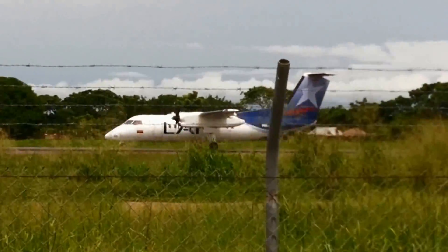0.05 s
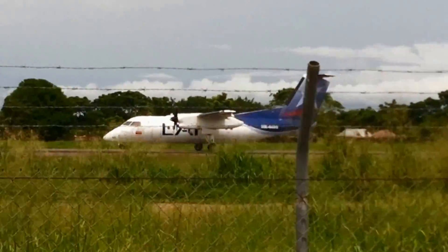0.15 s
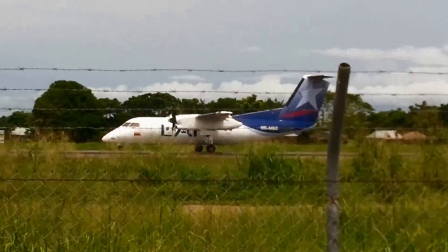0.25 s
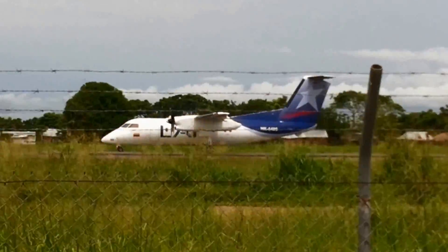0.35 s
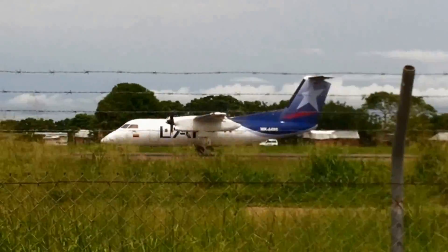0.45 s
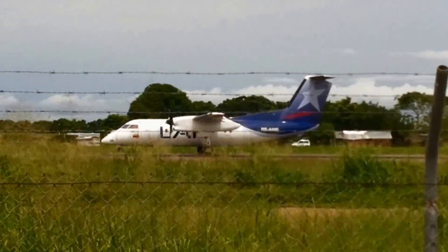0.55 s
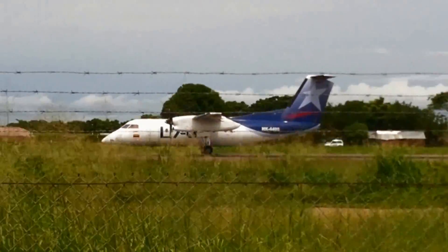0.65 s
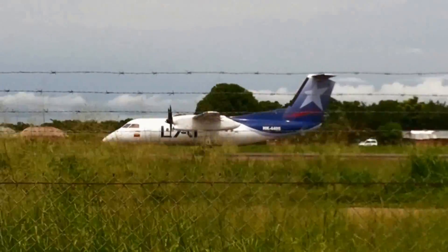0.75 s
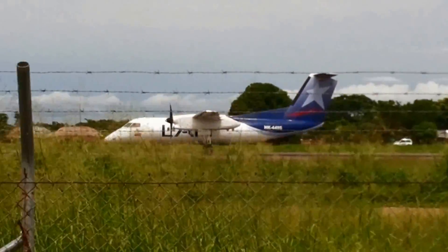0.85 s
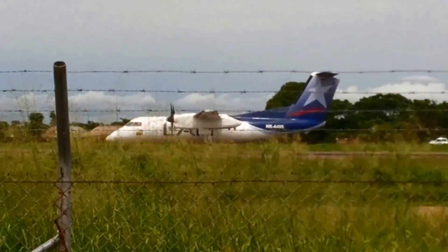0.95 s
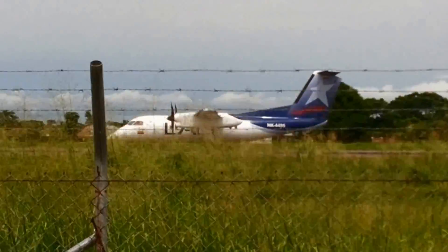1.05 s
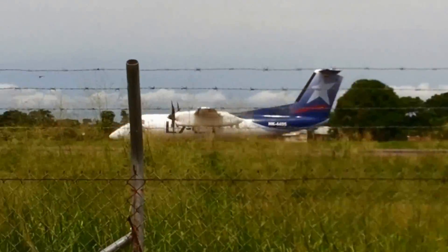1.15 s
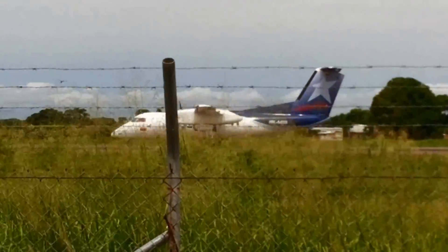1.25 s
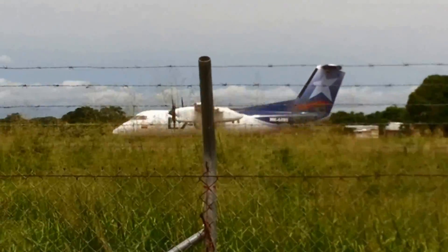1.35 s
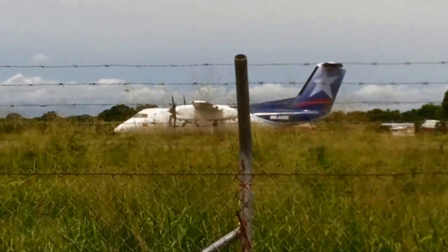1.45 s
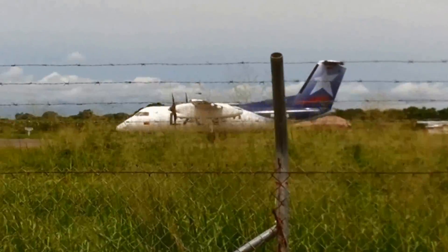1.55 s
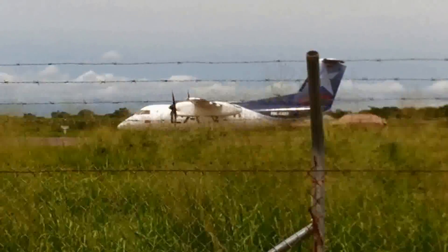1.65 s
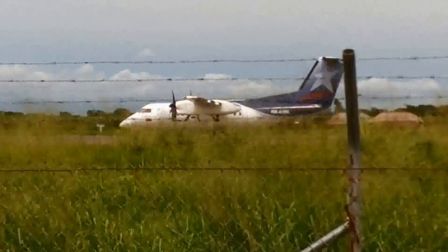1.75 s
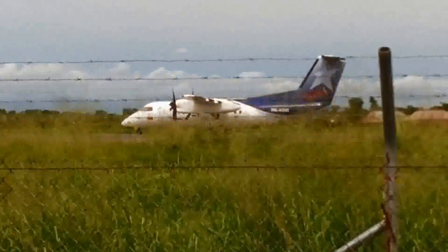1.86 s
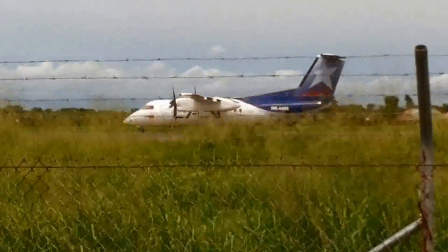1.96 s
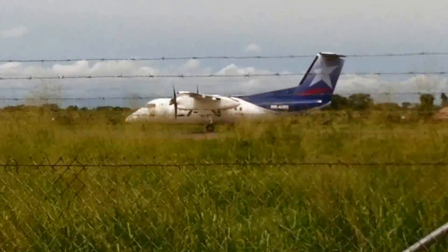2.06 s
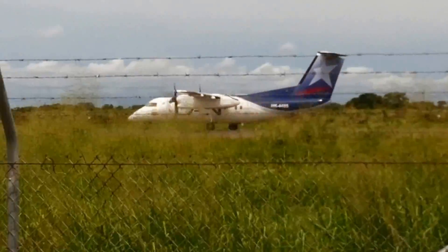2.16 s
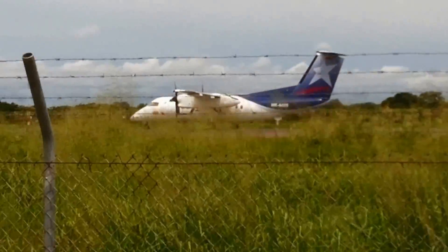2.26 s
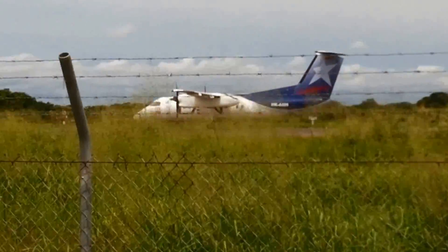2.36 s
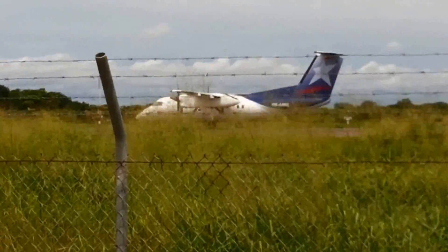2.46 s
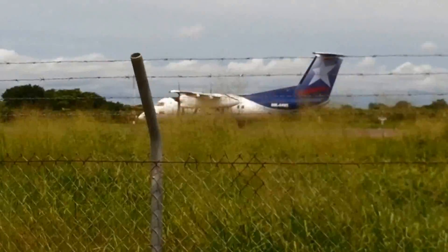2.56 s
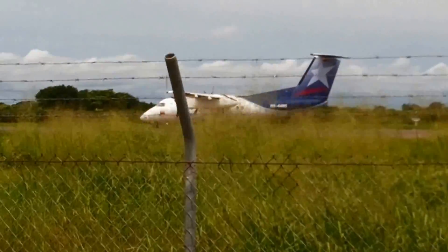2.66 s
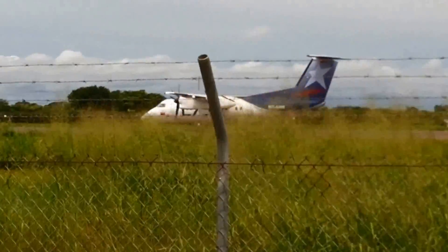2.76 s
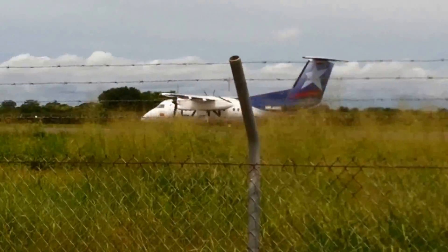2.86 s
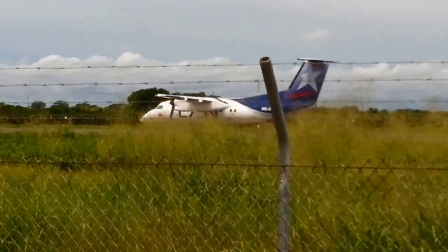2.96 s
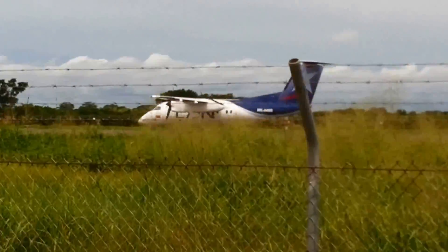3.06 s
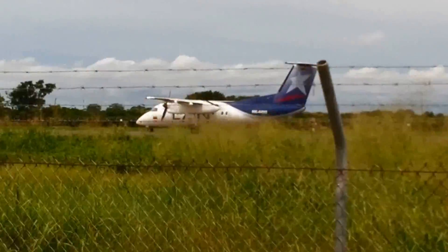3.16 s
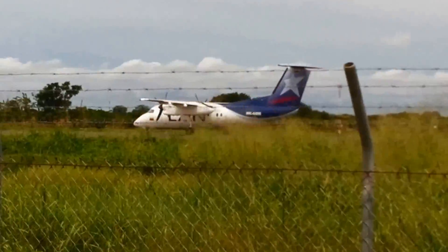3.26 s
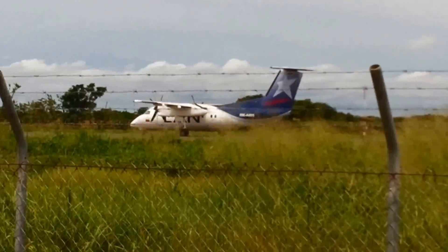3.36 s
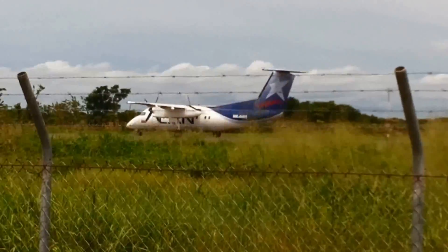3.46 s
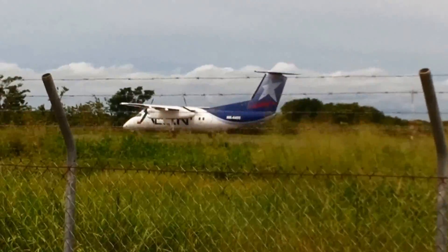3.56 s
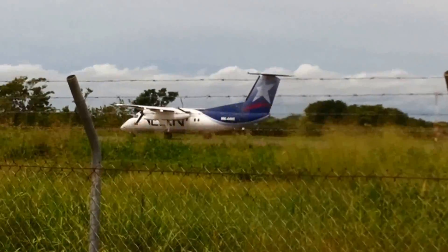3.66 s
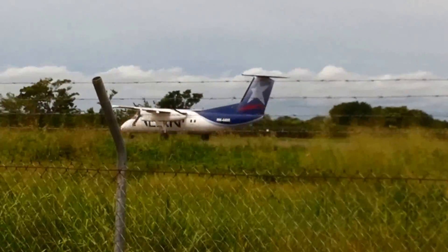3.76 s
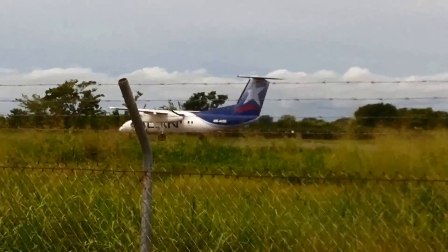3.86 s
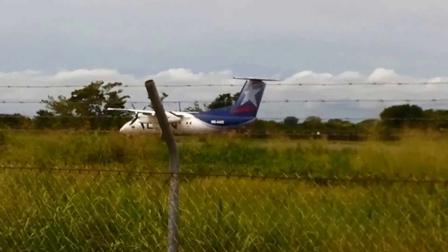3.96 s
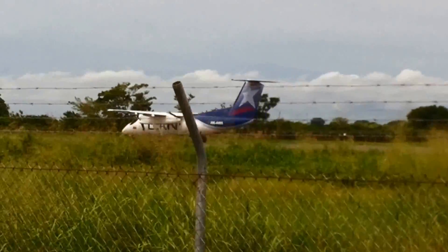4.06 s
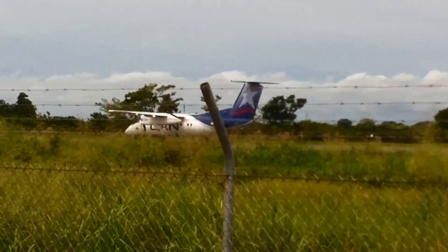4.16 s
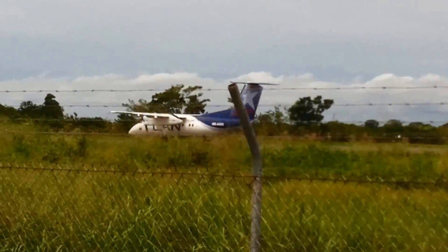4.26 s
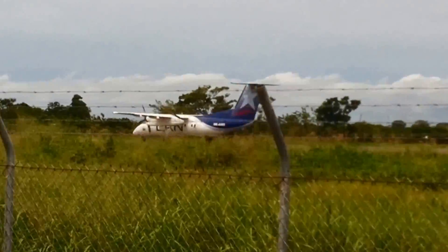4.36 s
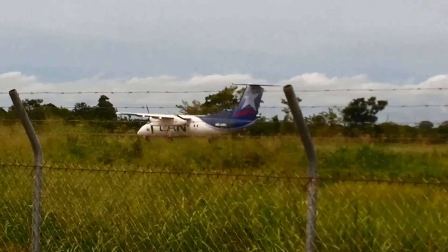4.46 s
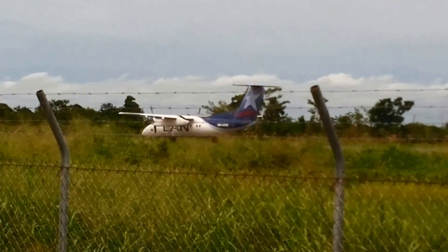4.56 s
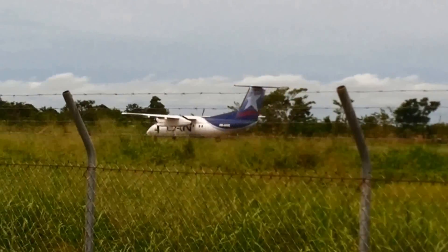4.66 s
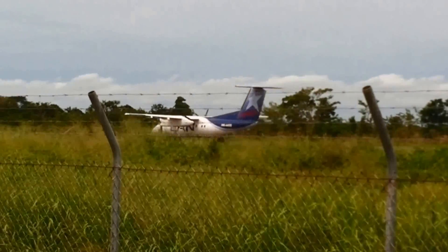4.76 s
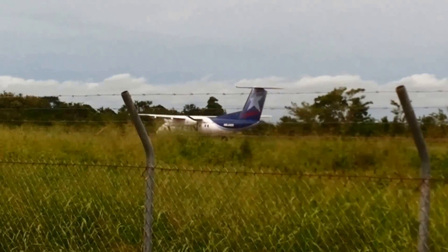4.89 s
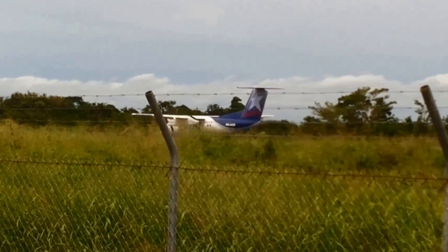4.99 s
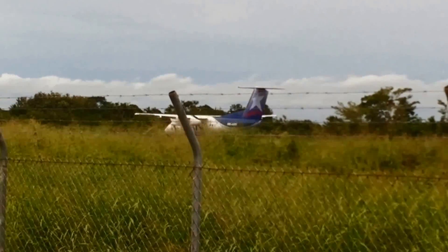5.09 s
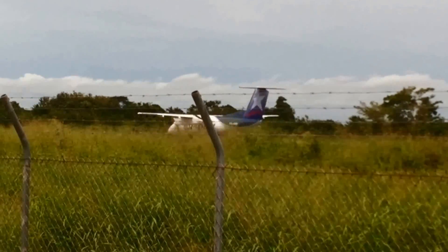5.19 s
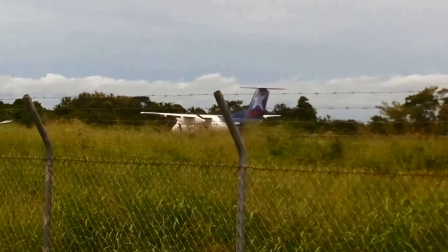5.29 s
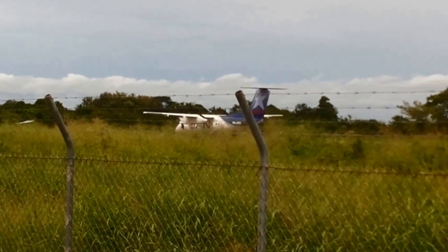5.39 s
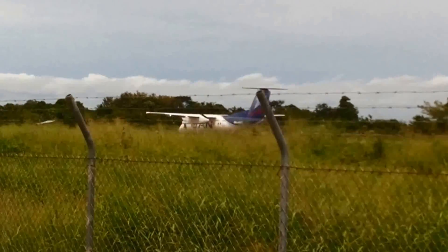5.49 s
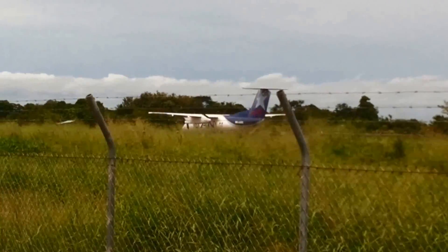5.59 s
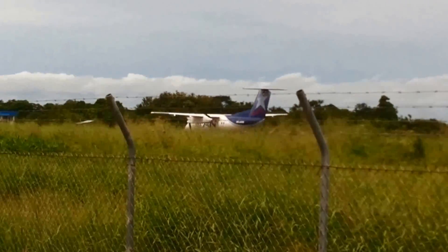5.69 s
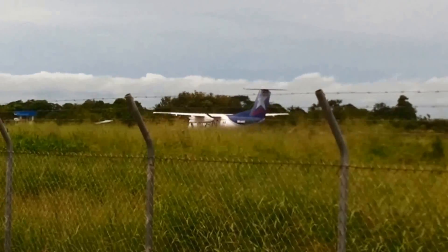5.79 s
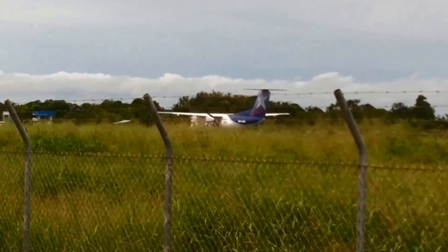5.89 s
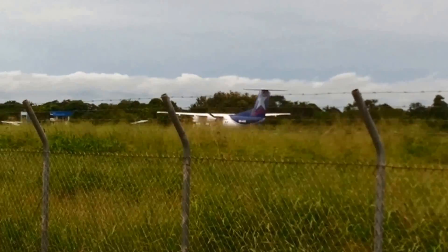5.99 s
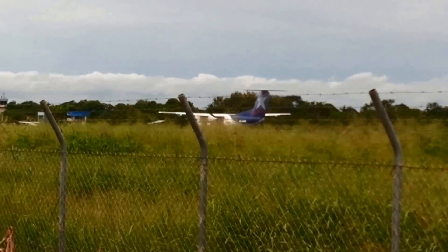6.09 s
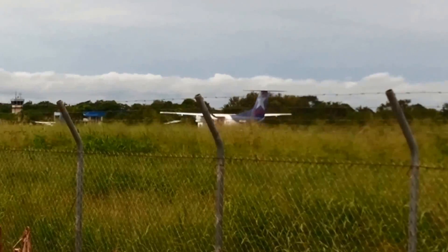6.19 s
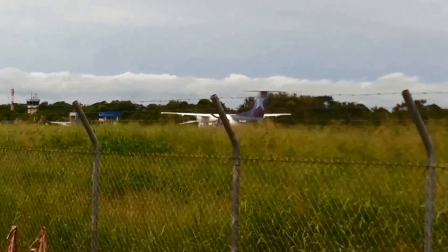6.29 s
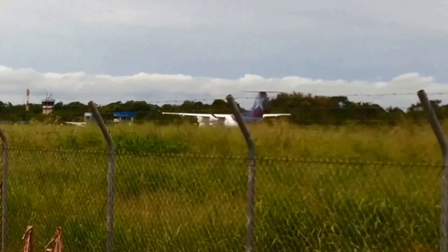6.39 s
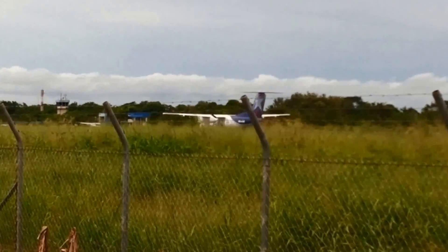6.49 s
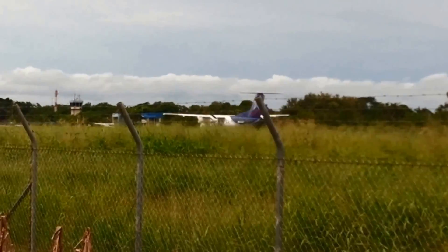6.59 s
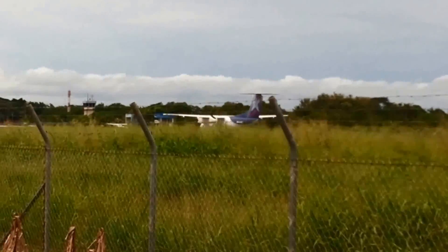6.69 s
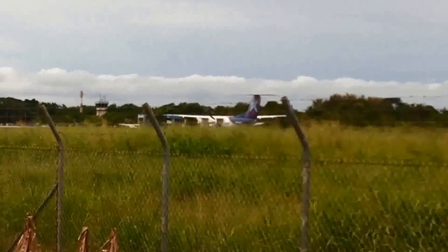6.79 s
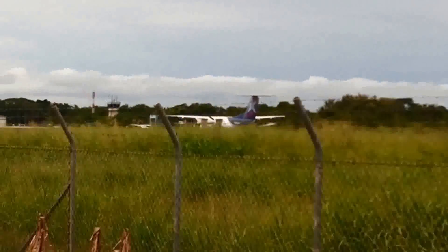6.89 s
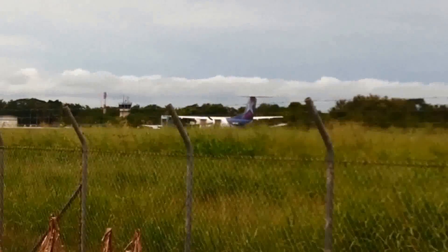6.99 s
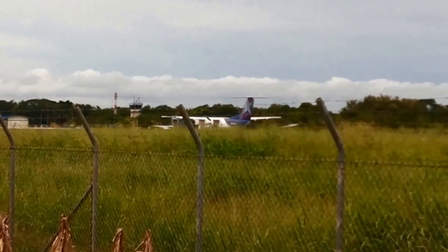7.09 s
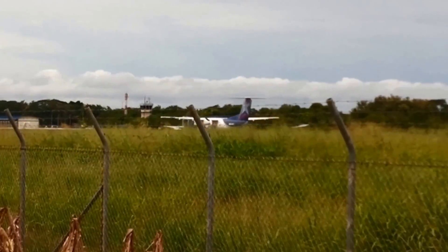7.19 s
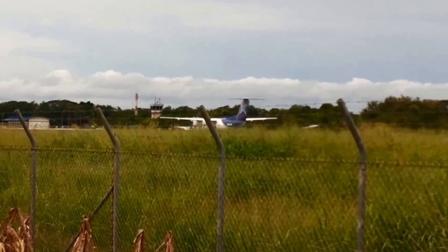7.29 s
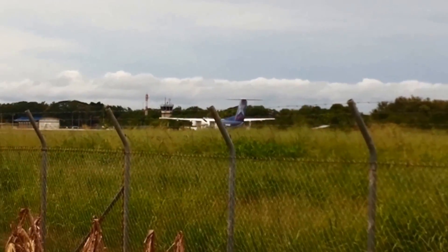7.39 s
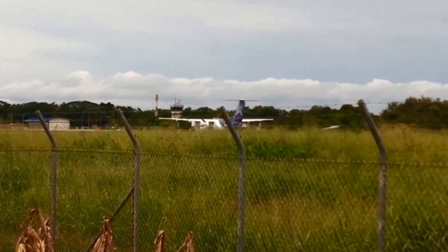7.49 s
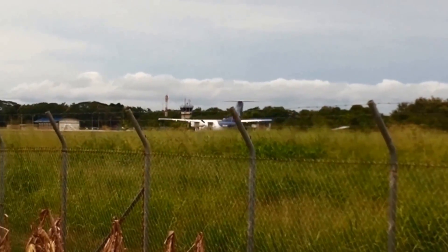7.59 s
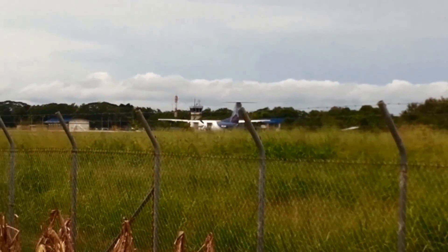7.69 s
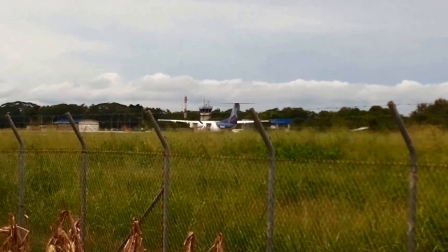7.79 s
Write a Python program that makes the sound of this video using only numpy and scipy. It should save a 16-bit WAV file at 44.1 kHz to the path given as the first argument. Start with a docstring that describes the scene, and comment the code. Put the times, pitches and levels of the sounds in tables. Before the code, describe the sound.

Loud from the start, a propeller airliner runs along a runway, with a deep drone, a rushing roar and a piercing, fluttering turbine whine. The high hiss surges in short bursts, the strongest slightly overloading the microphone at the airfield's edge. Around halfway the sound drops, swells once more, then fades as the plane moves away, its propeller pitch sliding gently down and its shrillness softening.

```python
"""Twin turboprop take-off roll.

Heard from the fence, it passes at full power and recedes down the runway. The propellers drone on a
sinking pitch over the roar of exhaust and slipstream; a compressor whines. A higher turbine tone,
scattered by the blade wakes into a shrill chopped hiss, flares in the moving air and overloads the mic."""
import sys
import numpy as np
from scipy import signal
from scipy.fft import rfft, irfft, next_fast_len
from scipy.io import wavfile
from scipy.ndimage import uniform_filter1d, map_coordinates

SR = 44100
rng = np.random.default_rng(int(sys.argv[2]) if len(sys.argv) > 2 else 0)


def dump_mix(stems):
    """Bounce the given channels to the path in sys.argv[1] as a 16-bit WAV at rate SR."""
    frames = np.atleast_2d(stems).T  # one column per channel
    limited = np.clip(frames, -1, 1)  # hard clip at full scale
    pcm = np.round(limited * 32767).astype(np.int16)
    wavfile.write(sys.argv[1], SR, pcm)


N = 345744

# Fade with distance, scaled per source: time_s, level_db
DISTANCE_FADE = [(0, -0.5), (3.2, 0), (4.1, -3.5), (4.85, -9), (6.2, -11.5), (7.84, -18.5)]
# Moving air focuses or thins the sound, scaled per source: centre_s, half_width_s, turbine_db, roar_db
AIR_SWELLS = [(0.08, .06, 0, 2.5), (0.324, 0.052, 4.5, 1), (0.448, 0.055, -0.5, 2), (0.894, 0.11, -6, -1.5),
              (1.427, 0.12, 3.5, 1), (1.696, .1, -2.5, 3), (1.89, 0.082, 4.5, 1), (2.165, 0.072, 1.5, 2.5),
              (2.42, .08, -2, 0), (2.63, 0.044, 9.5, 2), (2.744, 0.034, 0.5, 0), (3.006, 0.037, 1, 3),
              (3.288, 0.076, 2, 1.3), (3.537, 0.11, -3.5, 0), (3.7, 0.076, 0.5, 2), (4.001, .05, 3, 0.5),
              (4.23, .08, -5.5, -4.5), (4.412, 0.14, 8.5, 5.5), (5.97, 0.062, 5, 3), (6.0, 0.24, 1.5, 1.9),
              (6.676, .18, -2, 2)]
# Doppler-shifted blade-passing rate: time_s, rate_hz
BLADE_RATE = [(0, 82.3), (1, 80.8), (2, 79.2), (3, 77.7), (3.8, 76.5), (4.5, 75.9), (5.4, 74.2),
              (6.2, 73.3), (7.84, 72.5)]
# Order 1, propellers drifting in and out of step: time_s, level_db
PROP_ORDER_1 = [(0.0, -27), (0.44, -26.5), (0.96, -19.5), (1.53, -24), (1.68, -19.5), (2.31, -28),
                (2.42, -24), (2.64, -28), (2.9, -23), (3.62, -20), (4.08, -29.5), (5.26, -33),
                (5.46, -28.5), (7.1, -32.5), (7.8, -37.5), (7.84, -39)]
# Order 2, likewise: time_s, level_db
PROP_ORDER_2 = [(0.0, -23), (0.39, -25), (0.61, -22), (0.98, -23.5), (1.14, -38.5), (1.7, -18), (1.94, -17),
                (2.07, -13), (2.99, -19), (3.32, -33.5), (3.36, -25), (3.97, -22), (4.98, -48.5),
                (5.72, -39), (5.81, -48.5), (6.97, -38.5), (7.73, -40), (7.84, -49)]
# Upper orders, beamed sideways: time_s, order3_db, order4_db
PROP_ORDERS_3_4 = [(0, -30.5, -35.5), (.85, -28, -46), (1.22, -34.5, -36.5), (1.75, -33, -31.5),
                   (1.97, -38, -52), (2.16, -26.5, -44), (2.57, -45, -56), (2.86, -26.5, -52),
                   (3.13, -26, -54), (3.42, -40, -55), (4.2, -47.5, -54), (7.84, -73, -61)]
# Wake rumble: freq_hz, density_db
WAKE_SPECTRUM = [(20, -43), (55, -19), (88, 2.5), (115, 8.5), (135, 3.5), (165, -9.5), (300, -60),
                 (1000, -70)]
# Contour driving slipstream and wash: time_s, level_db
SLIPSTREAM_CONTOUR = [(0.0, -31), (0.5, -31), (0.52, -27.5), (1.14, -30), (1.7, -27), (2.23, -28),
                      (2.42, -24), (2.53, -29), (3.6, -26), (4.17, -31), (4.41, -30), (4.87, -35.5),
                      (6.2, -38.5), (6.24, -39.5), (7.82, -44), (7.84, -46)]
# Slipstream: freq_hz, density_db
SLIPSTREAM_SPECTRUM = [(150, -17), (290, -0.5), (410, -5.5), (500, -0.5), (640, 2.5), (760, -0.5),
                       (920, -12.5), (1500, -25), (4000, -77)]
# Propeller wash: freq_hz, density_db
WASH_SPECTRUM = [(60, -46), (140, -4.5), (200, -1.5), (250, -11), (400, -35), (1000, -72)]
# Humps of the exhaust roar: centre_hz, nominal_width_hz, relative_db
EXHAUST_HUMPS = [(1125, 290, -7), (1293, 184, -4.5), (1758, 183, -0.5), (1947, 246, 0.5), (2493, 237, 1.5),
                 (2980, 275, 1), (3603, 274, -4)]
# Air over the blades: freq_hz, density_db
RUSH_SPECTRUM = [(800, -18), (3000, -5.5), (3950, -5), (4220, 1.5), (4480, -4.5), (4640, 0), (5100, -1.5),
                 (5420, -5.5), (5700, 0.5), (6000, -5.5), (8000, 13.5), (9500, 0), (10500, -12.5),
                 (11700, -17), (14000, -18.5), (16000, -23)]
# Turbine tone centre: time_s, pitch_hz
TURBINE_PITCH = [(0, 7550), (1.3, 7960), (2, 8066), (3.2, 8364), (4.9, 8320), (7.84, 8050)]
# Brief flares of the hiss: centre_s, lift_db, half_width_s
HISS_FLARES = [(0.118, 15, 0.0045), (.463, 10, 0.011), (1.095, 6, 0.0086), (1.751, 13.5, 0.0043),
               (1.898, 4, 0.0068), (2.195, 7, 0.02), (2.479, 7, 0.018), (2.56, 5.5, 0.01), (2.631, 5, 0.01),
               (2.657, 8.5, 0.016), (2.83, 12.5, 0.0098), (3.086, 8, 0.0064), (3.138, 7, .012),
               (3.965, 7, .007), (4.405, 7, 0.027), (5.937, 11, 0.0019)]
# Mic treble response, on the hiss only: freq_hz, gain_db
MIC_RESPONSE = [(5000, 7), (8000, 1), (8650, 1.5), (9100, -2), (9600, -12.5), (10500, -10), (16000, -10)]
# Doppler-shifted compressor tone: time_s, pitch_hz
COMPRESSOR_PITCH = [(0, 6940), (1.4, 6830), (3, 6520), (3.6, 6420), (4.4, 6380), (6, 6210), (7.84, 6110)]

TIME_S = np.arange(N) / SR


def amp(db):
    """Decibels to gain."""
    return 10 ** (np.asarray(db) / 20)


def unit_rms(x):
    """Scale to rms 1."""
    return x / np.sqrt(np.mean(np.abs(x) ** 2) + 1e-20)


def curves(rows):
    """Per-sample curve for each column after time_s."""
    times_s, *columns = np.transpose(rows)
    return [np.interp(TIME_S, times_s, column) for column in columns]


def bumps(rows):
    """Sum of bells in dB; rows: centre_s, half_width_s, lift_db."""
    return sum(db * np.exp(-np.minimum(((TIME_S - s) / half_s) ** 2, 20)) for s, half_s, db in rows)


def wobble(rate_hz):
    """Smooth random curve with knots at rate_hz."""
    knots = rng.standard_normal(int(N * rate_hz / SR) + 4)
    return map_coordinates(knots, [TIME_S * rate_hz])


def phase_rad(hz):
    """Running phase of a changing frequency."""
    return 2 * np.pi * np.cumsum(hz) / SR


def filtered(x, response):
    """Apply a frequency response."""
    size = next_fast_len(N + SR // 4)
    return irfft(rfft(x, size) * response(np.fft.rfftfreq(size, 1 / SR)), size)[..., :N]


def noise(response):
    """Coloured noise, rms 1."""
    return unit_rms(filtered(rng.standard_normal(N), response))


def shape(points):
    """Response through freq_hz, gain_db points on a log axis."""
    freq_hz, gain_db = np.transpose(points)
    return lambda hz: amp(np.interp(np.log(hz + 1), np.log(freq_hz), gain_db))


def scattered(phase, width_hz):
    """Tone smeared by turbulence into a bell-shaped band, rms 1."""
    bell = lambda hz: np.exp(-(hz / width_hz / 2) ** 2)
    return noise(bell) * np.cos(phase) + noise(bell) * np.sin(phase)


def aft(abreast_s=1.0, to_45_deg_s=1.85):
    """Aspect: negative from ahead, 0 side-on, 1 from straight behind."""
    past = (TIME_S - abreast_s) / to_45_deg_s
    return past / np.hypot(1, past)


def passing_db(base_db, fade, aft_db):
    """Base level plus scaled distance fade plus gain toward the tail."""
    return base_db + fade * curves(DISTANCE_FADE)[0] + aft_db * aft()


def propellers(blade_rad, waver_db=0.46, wander_rad=0.065):
    """Five blade-passing orders; higher ones waver more through the air."""
    orders_db = curves(PROP_ORDER_1) + curves(PROP_ORDER_2) + curves(PROP_ORDERS_3_4)
    orders_db.append(orders_db[-1] - 8)
    drone = np.zeros(N)
    for order, db in enumerate(orders_db, 1):
        phase = order * (blade_rad + wander_rad * wobble(14)) + rng.uniform(0, 2 * np.pi)
        drone += np.sqrt(2) * amp(db + order * waver_db * wobble(12)) * np.sin(phase)
    return amp(-0.08) * drone


def wake():
    """Low, slowly wavering rumble of the wake."""
    level_db = passing_db(-36.0, fade=0.39, aft_db=0.2) + 2.4 * wobble(3.9)
    return amp(level_db) * noise(shape(WAKE_SPECTRUM))


def slipstream(swell_db):
    """Air thrown back by the propellers; its deeper wash rises and falls more steeply."""
    drive_db = curves(SLIPSTREAM_CONTOUR)[0] + 0.23 * swell_db
    stream = amp(drive_db + 0.66 + 1.3 * wobble(9)) * noise(shape(SLIPSTREAM_SPECTRUM))
    wash = amp(1.45 * drive_db + 8.5) * noise(shape(WASH_SPECTRUM))
    return stream + wash


def exhaust(swell_db, flutter_db=1.52):
    """Exhaust roar; each hump flutters separately in the moving air."""
    humps = np.zeros(N)
    for centre_hz, width_hz, db in EXHAUST_HUMPS:
        band = noise(lambda hz: 1 / (1 + ((hz - centre_hz) * 1.35 / width_hz) ** 2))
        humps += amp(db + flutter_db * wobble(11)) * np.sqrt(width_hz) * band
    level_db = passing_db(-22.5, fade=0.87, aft_db=-0.75) + swell_db
    return amp(level_db + 0.29 * wobble(14)) * unit_rms(humps)


def blade_rush(swell_db):
    """Bright rush of air over the blades."""
    level_db = passing_db(-22.5, fade=0.85, aft_db=-0.5) + 1.17 * swell_db
    return amp(level_db + 0.41 * wobble(11)) * noise(shape(RUSH_SPECTRUM))


def turbine(blade_rad, swell_db, flicker_db=1.0, skirt_db=-10.0, narrow_hz=160, wide_hz=620):
    """Each blade wake sweeps the turbine tone upward and lets out a burst of it."""
    level_db = passing_db(-17.5, fade=1.56, aft_db=-0.3) + swell_db + 0.9 * wobble(16)
    centre_hz, = curves(TURBINE_PITCH)
    focus_db = np.maximum(swell_db, 0)  # swells: deeper chop, wider sweep, purer tone
    chop_db = 4 + 0.38 * focus_db
    sweep_scale_hz = 307 + 24.6 * focus_db
    scatter_hz = 580 - 184 * aft() - 10 * focus_db
    wake_rad = blade_rad + 0.12 * wobble(40)
    sweep = np.sin(wake_rad) - 0.42 * np.sin(2 * wake_rad)  # slow rise, quick fall
    phase = phase_rad(centre_hz + sweep_scale_hz * sweep + 110 * wobble(90))
    wide_share = np.clip((scatter_hz ** 2 - narrow_hz ** 2) / (wide_hz ** 2 - narrow_hz ** 2), 0, 1)
    tone = np.sqrt(1 - wide_share) * scattered(phase, narrow_hz)
    tone += np.sqrt(wide_share) * scattered(phase, wide_hz)
    skirt = amp(skirt_db) * scattered(phase_rad(centre_hz - 700), 810)  # strongly scattered part
    bursts = amp(chop_db * np.sin(wake_rad) + 1.2 * wobble(190))
    bursts /= np.sqrt(uniform_filter1d(bursts ** 2, size=2300))  # wakes bunch power, add none
    flare_db = bumps((s, half_s, db) for s, db, half_s in HISS_FLARES)
    hiss = amp(level_db + flicker_db * wobble(70)) * (amp(flare_db) * bursts * tone + skirt)
    return filtered(hiss, shape(MIC_RESPONSE))


def compressor(swell_db, line_hz=59.0, halo_hz=313):
    """Forward-beamed whistle with a scattered halo and a faint octave."""
    pitch_hz, = curves(COMPRESSOR_PITCH)
    level_db = passing_db(-18.5, fade=1.05, aft_db=-8.0) + 0.82 * swell_db
    line_share = np.clip(0.48 - 0.018 * curves(DISTANCE_FADE)[0], 0, 1)  # purer from far behind
    phase = phase_rad(pitch_hz)
    whistle = np.sqrt(line_share) * scattered(phase, line_hz)
    halo = np.sqrt(1 - line_share) * scattered(phase_rad(pitch_hz * 1.01), halo_hz)
    octave = amp(passing_db(-28, fade=0.25, aft_db=7)) * scattered(2 * phase, 420)
    return amp(level_db + 0.78 * wobble(25)) * (whistle + halo + octave)


def intake_whistle(start_hz=5160, sag_hz_per_s=32, line_hz=89):
    """Lower whistle; fades as the intakes turn away."""
    pitch_hz = start_hz - sag_hz_per_s * TIME_S
    level_db = passing_db(-36.5, fade=1.54, aft_db=-6.5) + 1.5 * wobble(18)
    return amp(level_db) * scattered(phase_rad(pitch_hz), line_hz)


def through_air(x, corner_hz=8970):
    """Treble shelf that sinks with distance."""
    low = filtered(x, lambda hz: 1 / (1 + (hz / corner_hz) ** 40))
    return low + amp(passing_db(1.7, fade=0.49, aft_db=-3.3)) * (x - low)


def gain_control(x, ceiling_db, response_s):
    """Gain drops as recent power nears and passes the ceiling."""
    pole = np.exp(-1 / (response_s * SR))
    power_ratio = signal.lfilter([1 - pole], [1, -pole], x ** 2) / amp(ceiling_db) ** 2
    return x / (1 + power_ratio ** 4) ** (1 / 8)


def overload(x, limit=0.96, knee=14):
    """Peaks round off near full scale."""
    return x / (1 + np.abs(x / limit) ** knee) ** (1 / knee)


def scene():
    """Both engines as one mono source, over faint even hiss."""
    blade_rad = phase_rad(curves(BLADE_RATE)[0])
    shrill_db = bumps((s, half_s, db) for s, half_s, db, _ in AIR_SWELLS)
    roar_db = bumps((s, half_s, db) for s, half_s, _, db in AIR_SWELLS)
    throb = 1 + 0.1 * np.sin(blade_rad)
    drone = propellers(blade_rad)
    roar = wake() + slipstream(roar_db) + throb * (exhaust(roar_db) + blade_rush(roar_db))
    hiss = turbine(blade_rad, shrill_db)
    whine = compressor(shrill_db) + intake_whistle()
    aircraft = through_air(drone + roar + hiss + whine)
    floor = amp(-55.5) * rng.standard_normal(N)
    return (aircraft + floor)[None]


def record(dry):
    """Duck under the loudest flares, soft-clip, band-limit."""
    ducked = gain_control(dry, ceiling_db=-7.5, response_s=0.02)
    return filtered(overload(ducked), lambda hz: hz < 15750)


dry = scene()
out = record(dry)
dump_mix(out)
```